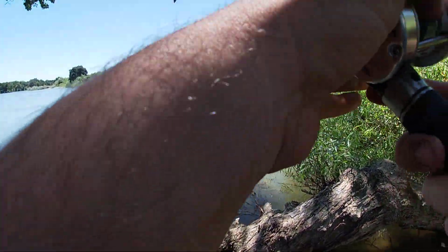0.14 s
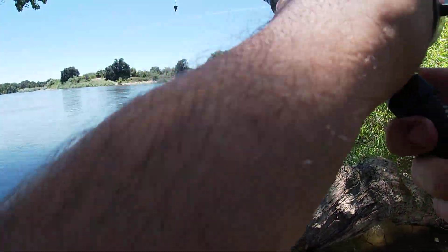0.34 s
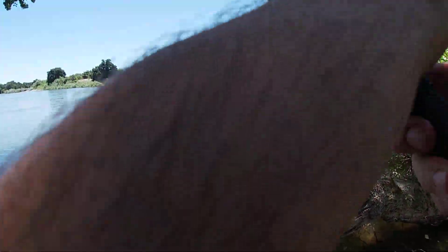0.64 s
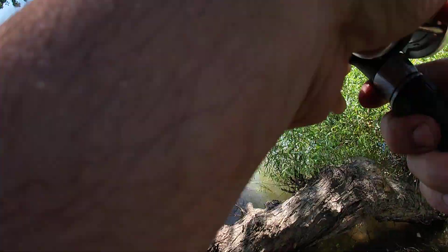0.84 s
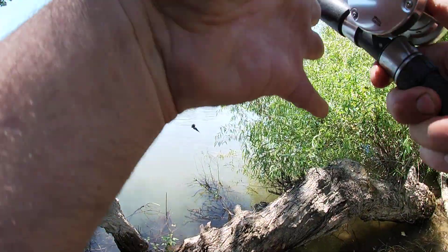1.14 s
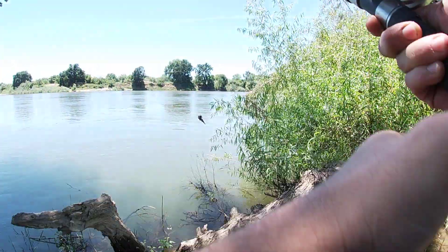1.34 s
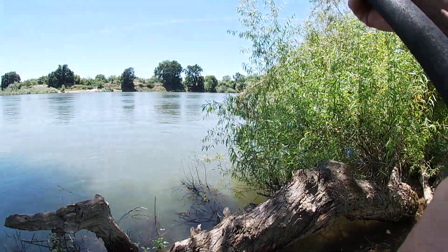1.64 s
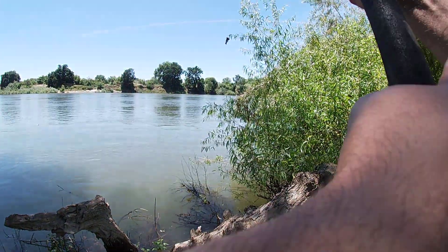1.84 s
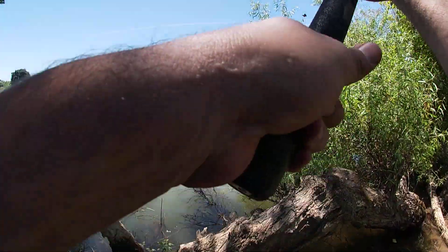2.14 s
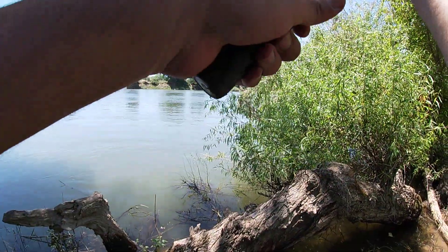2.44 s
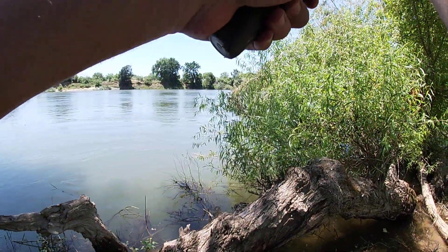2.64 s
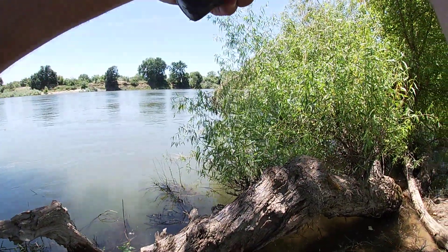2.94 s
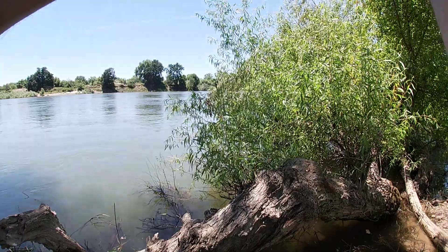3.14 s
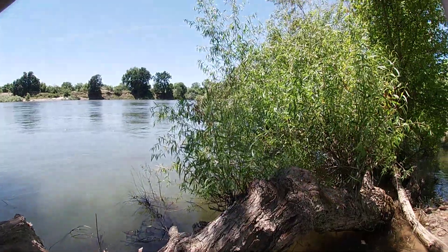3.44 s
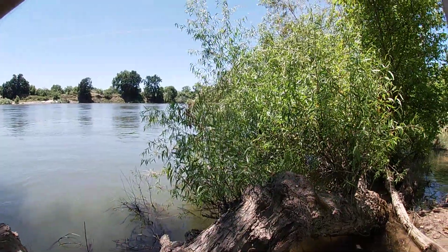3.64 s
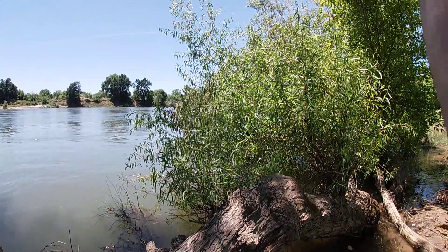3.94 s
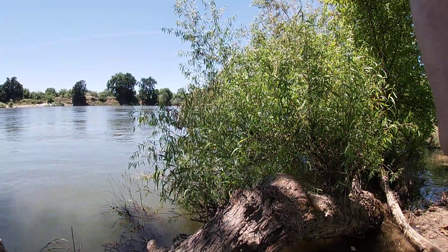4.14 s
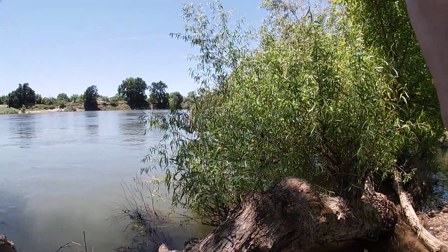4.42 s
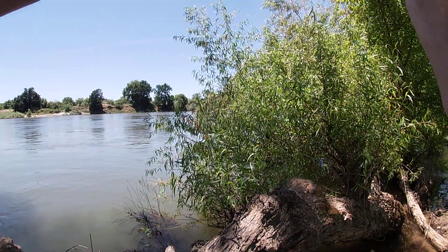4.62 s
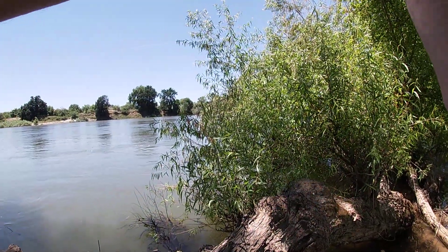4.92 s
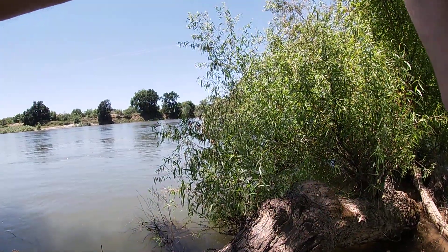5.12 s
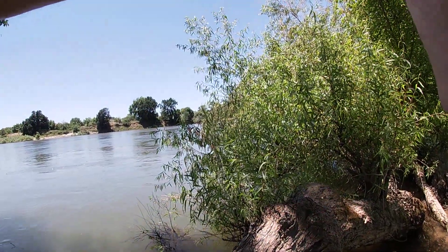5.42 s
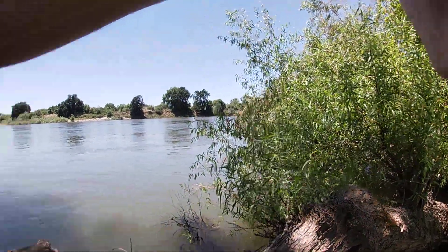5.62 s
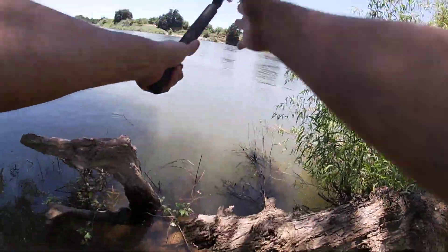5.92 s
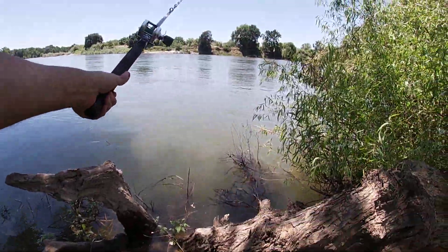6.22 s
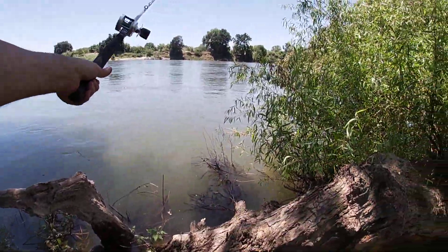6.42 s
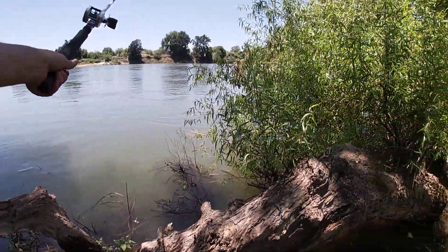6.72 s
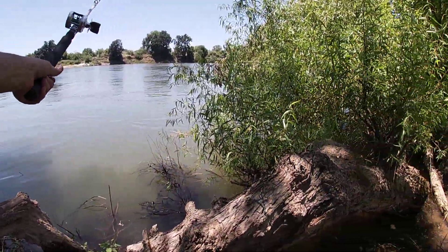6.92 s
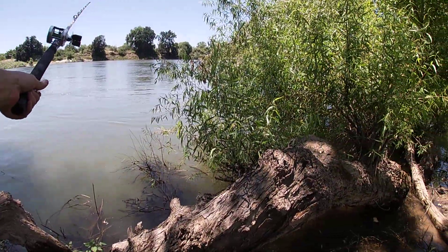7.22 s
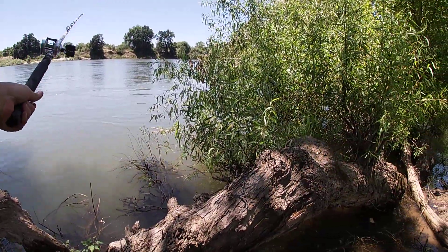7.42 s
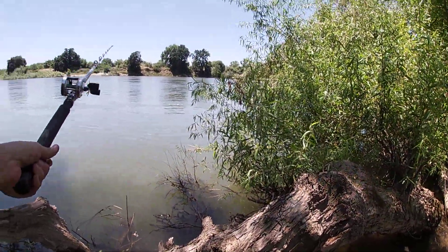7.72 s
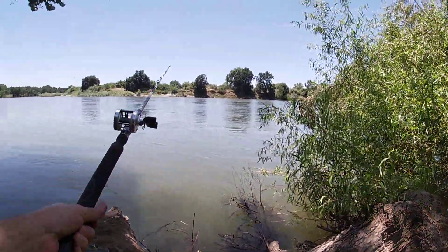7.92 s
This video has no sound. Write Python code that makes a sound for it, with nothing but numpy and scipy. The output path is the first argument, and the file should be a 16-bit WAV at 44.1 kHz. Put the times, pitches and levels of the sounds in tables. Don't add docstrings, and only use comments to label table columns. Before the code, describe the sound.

Sharp reel clicks and small handling rustles over a low distant boat motor, then a rod-casting swish and a thin whirring spool gradually slowing.

```python
import sys
import numpy as np
from scipy import signal
from scipy.fft import rfft, irfft
from scipy.io import wavfile
from scipy.ndimage import uniform_filter1d

SR = 44100
rng = np.random.default_rng(int(sys.argv[2]) if len(sys.argv) > 2 else 0)


def master_out(mix):
    frames = np.transpose(np.atleast_2d(mix))
    ceiling = np.clip(frames, -1, 1)
    pcm = np.round(ceiling * 32767).astype(np.int16)
    wavfile.write(sys.argv[1], SR, pcm)


def voltage_ratio(level):
    return 10 ** (np.asarray(level, float) / 20)


N = 355490

SPIN_S, SPIN_HZ, SAG_HZ_PER_S = 5.98, 2966, 221.7
BRAKE_S, BRAKE_HZ_PER_S = 8.01, 1500
BUMPS_PER_TURN = 13
WHINE_DB, WHINE_DB_PER_OCTAVE = -44.5, 11
# centre in seconds, rise of the tone in Hz,
# half length in seconds.
LINE_TUGS = [(6.068, 541, .034), (6.141, 704, .082), (6.293, 151, .052), (6.508, 550, .066),
             (6.61, 34, .027), (6.762, 311, .083), (6.892, 76, .029), (7.069, 135, .07), (7.103, 38, .029),
             (7.329, 41, .051), (7.738, 71, .058), (7.993, 101, .102)]
BALL_ORDERS = [8.66, 10.05, 15.13, 17.33, 20.11, 21.66, 34.66, 43.33]
BALL_ORDER_DB = [2, 6, 5.5, 2, 0, 4, 3, 1]
BUMP_OVERTONE_DB = [9, 10, 6]
# centre in Hz, width in Hz, level in dB.
FRAME_MODES = [(1310, 1460, -16.5), (2030, 930, -14.5), (2905, 640, 0), (4420, 650, 0.5), (5400, 2600, -19),
               (6790, 740, 1), (8480, 700, -9.5), (10000, 460, -4.5), (11700, 90, -8), (12300, 80, -15),
               (12000, 2200, -23), (14100, 900, -16.5)]
HAND_HOLD = {5: [(6, -0.5), (6.24, -1), (6.32, -2), (6.55, 0), (6.63, 0), (7.15, -0.5), (7.45, -0.5),
             (7.68, 1.5), (7.74, -2)], 7: [(6.16, -7), (6.24, -0.5), (7.5, -1), (8.06, 1)], 8: [(6.85, -12),
             (6.95, 4), (7.25, 2), (7.4, -4)], 10: [(6.2, -8), (6.35, 3)], 11: [(6.2, -12), (6.3, 3)]}
# cycles per turn,
# then rows of centre in seconds, half length in seconds, level in dB.
BEARING_SINGS = [
    (13, [(6.08, .03, -42.5), (6.15, 0.03, -52), (6.22, .03, -54), (6.29, .015, -57), (6.34, .025, -49), (6.42, .02, -50), (6.5, 0.021, -51.5), (6.62, .018, -47.5), (6.7, .03, -52), (6.8, 0.022, -51), (6.92, 0.029, -53), (7.02, .03, -49), (7.1, 0.02, -54), (7.21, 0.018, -51), (7.31, 0.044, -53), (7.49, 0.04, -54.5), (7.62, .07, -52), (7.82, 0.06, -50), (7.94, 0.052, -52.5), (8.04, 0.027, -51)]),
    (10.05, [(6.08, 0.019, -48), (6.22, .025, -50), (6.31, .03, -53), (6.455, .011, -49), (6.67, 0.037, -52.5), (7.24, .04, -58.5)]),
    (15.13, [(6.07, 0.034, -52), (6.17, .04, -55), (7, .07, -59), (7.18, 0.021, -60), (7.3, .02, -57), (7.42, .05, -65), (7.6, .03, -68), (7.76, .03, -64), (7.95, .07, -60)]),
                 (17.2, [(6.24, .04, -53), (6.33, .03, -56), (6.54, .025, -54), (6.7, .03, -56),
              (6.82, .03, -58), (7.06, .03, -58), (7.84, 0.028, -57.5)]), (21.66, [(6.98, .02, -59),
              (7.22, .025, -57), (7.41, 0.035, -51), (7.6, .06, -52.5), (7.78, .05, -55), (8, 0.043, -52)]),
              (26, [(6.26, .025, -55), (6.44, .04, -52), (6.56, .04, -52), (6.76, .04, -56),
              (7.48, .04, -62), (7.8, 0.077, -57.5)]), (27, [(6.27, 0.036, -50), (6.46, .04, -55),
              (6.59, 0.031, -54), (6.75, .035, -55)]), (39, [(7.22, .09, -60), (7.5, 0.054, -57),
              (7.72, .1, -62), (7.88, .04, -59)]), (52, [(7.45, .06, -70), (7.65, .05, -68),
              (7.95, .06, -65)]), (53, [(7.32, .04, -68), (7.75, .06, -70)]), (28, [(6.4, .03, -57),
              (6.6, .03, -55), (6.8, .03, -57)]), (30.3, [(6.64, .015, -53), (6.92, .02, -54),
              (7.08, .05, -57)]), (33, [(7.2, .03, -58), (7.4, .04, -55), (7.55, .04, -63)]),
              (34.66, [(7.44, .03, -55), (7.6, .06, -57)]), (19, [(6.62, .04, -57), (6.8, .06, -58)]),
              (20.11, [(6.36, .03, -60), (6.7, .04, -57), (7, .05, -58), (7.3, .04, -59)]),
              (25, [(6.5, .05, -52), (6.78, .05, -62)]), (31.8, [(7.06, .06, -59)]),
              (39.9, [(6.28, .03, -60), (6.52, .05, -62), (7.65, 0.049, -58), (7.86, 0.057, -55)])]

# time in seconds, housing hum in dB.
SWING_EFFORT = [(5.6, -69), (5.66, -64), (5.712, -55), (5.74, -44), (5.788, -50.5), (5.812, -48),
                (5.954, -55.5), (6.094, -47), (6.162, -56), (6.45, -58)]
# frequency in Hz, density in dB per Hz.
SWISH_SPECTRUM = [(120, -25), (200, 1), (650, -2.5), (1600, -6.5), (3000, -4.5), (3900, -8), (4800, -12),
                  (5600, -10.5), (8000, -13), (16000, -33)]

# start in seconds, peak in dB, low ring in Hz, high ring in Hz,
# length in seconds.
LEVER_CLICKS = [(0.267, -47, 6750, 11500, 0.0011), (0.557, -49, 1240, 4100, 0.0012),
                (0.785, -26.5, 1190, 2980, 0.00054), (0.7876, -29.5, 1670, 3000, 0.00092),
                (1.043, -22, 1620, 4090, 0.0008), (1.0725, -28, 1590, 4300, 0.0014),
                (1.11, -30.5, 4360, 1500, 0.0011), (1.159, -28, 3900, 3920, 0.0016),
                (1.171, -34, 2570, 4400, 0.0013), (1.1885, -40, 1820, 1760, .0013),
                (1.0035, -43, 1500, 1600, .0012), (0.762, -40, 1270, 2500, .001),
                (0.842, -41, 1850, 1000, .001), (0.907, -46, 1710, 1000, .001),
                (0.915, -40.5, 1640, 1300, .0012), (0.949, -41, 1650, 4300, .001),
                (.957, -43, 1600, 1300, .0012), (0.974, -42, 1600, 2200, .001),
                (4.305, -45, 2850, 2900, .0012), (1.014, -45, 1700, 1650, 0.0011),
                (1.133, -31, 4700, 2600, .001), (1.156, -34, 4900, 1500, 0.0011),
                (2.071, -32.5, 1360, 4420, 0.00031), (2.08, -40, 2660, 4500, 0.00089),
                (2.12, -39.5, 1320, 5700, 0.0006), (3.462, -36, 2690, 1300, 0.0014),
                (3.697, -34.5, 1950, 4360, 0.00052), (3.905, -43, 1510, 6300, 0.0011)]
# start in seconds, peak in dB, low ring in Hz, high ring in Hz.
GUIDE_TICKS = [(0.1064, -34.5, 3560, 6150), (0.471, -45.5, 10000, 14000), (.4716, -41, 3060, 6840),
               (1.088, -43, 8900, 6200), (0.756, -46, 2460, 9500), (1.128, -23, 4150, 7470),
               (1.292, -44, 4120, 7440), (3.348, -34, 7700, 2940), (4.2068, -37, 2860, 4240),
               (3.374, -42, 12000, 9000), (3.437, -50, 12000, 11000), (.335, -48, 4900, 10000),
               (5.723, -40, 2700, 5530), (5.7344, -42, 2730, 6000), (5.7843, -32, 12500, 6350),
               (5.8187, -24.5, 3520, 7360), (5.8205, -28, 2900, 8300), (5.745, -44, 12500, 9000),
               (5.87, -42, 9500, 12000), (5.8776, -34, 4490, 6160), (5.917, -33, 4400, 13500),
               (5.9737, -24, 2560, 7440)]
# start in seconds, peak in dB, ring in Hz.
HOUSING_JOLTS = [(5.7114, -37, 1210), (5.7246, -30, 1230), (5.731, -35, 1240), (5.7377, -32, 1280),
                 (5.745, -32, 1190), (5.7504, -32, 1165), (5.7553, -23, 1230), (5.7644, -35, 1270)]
# start in seconds, peak in dB.
SNAP_BLOWS = [
    (.613, -20),
    (.6145, -5),
    (.6154, -11),
    (.6167, -16),
    (.6178, -16),
    (.6228, -36),
]
# frequency in Hz, 60 dB decay in seconds, level in dB.
SNAP_MODES = [(190, .03, -17), (820, 0.039, -12), (1200, 0.018, -9), (2090, 0.008, -2), (2570, 0.0085, -10),
              (3050, 0.008, -8), (3970, .007, -4), (4880, 0.005, -4), (5400, 0.007, -6), (5960, 0.007, -6),
              (8600, 0.0043, -5)]
# start in seconds, level in dB, frequency in Hz, 60 dB
# decay in seconds.
HOUSING_KNOCKS = [
    (0.62, -24, 186, 0.054),
    (1.1303, -11.5, 115, 0.014),
    (2.119, -20.5, 150, 0.014),
    (2.903, -36.5, 112, 0.29),
    (3.66, -24, 121, 0.04),
    (5.721, -45, 34, 0.18),
    (5.756, -15, 50, 0.033),
]

# start in seconds, length in seconds, level in dB, centre in Hz.
CLOTH_RUBS = [(0, 0.052, -44, 600), (0, 0.0037, -43.5, 6000), (.01, 0.021, -50, 3500),
              (0.121, 0.067, -51, 5000), (0.186, 0.068, -58, 3900), (.617, 0.027, -45.5, 900),
              (0.619, 0.015, -45, 4000), (0.778, 0.065, -52, 5370), (0.96, 0.044, -56, 7040),
              (1.123, 0.013, -44, 3850), (1.126, 0.018, -43, 2440), (1.156, 0.012, -43, 2500),
              (1.677, 0.058, -49.5, 6500), (1.731, 0.1, -59, 6500), (1.888, 0.075, -51, 4580),
              (2.076, .028, -57, 3980), (2.106, 0.13, -56.5, 3560), (2.23, 0.15, -61, 3480),
              (3.093, 0.045, -60.5, 5000), (3.342, 0.052, -48.5, 6500), (3.348, 0.048, -52.5, 3240),
              (3.518, .091, -64, 8000), (3.685, .036, -58, 5010), (4.129, 0.031, -59.5, 6000),
              (4.224, 0.056, -57, 5030), (5.721, 0.11, -42.5, 3140), (1.125, .045, -44, 750),
              (0.618, 0.036, -42.5, 400), (.25, 0.19, -60, 1500), (0.198, 0.12, -60, 3200)]
# start in seconds, length in seconds, level in dB, centre in Hz.
LINE_RUSTLES = [(0, .35, -71, 11700), (.635, .09, -59, 11500), (.77, .2, -58, 11500),
                (1.08, .075, -56, 14000), (.1, 0.18, -62, 14000), (5.73, 0.22, -48, 13500)]
# start in seconds, length in seconds, level in dB, centre in Hz.
GRIP_CREAKS = [(0, 0.042, -38, 1760), (.67, 0.059, -54.5, 2610), (.684, 0.054, -52, 6160),
               (.912, 0.069, -57, 1600), (1.085, 0.03, -54, 1700), (3.354, .04, -49.5, 1280),
               (3.887, 0.024, -57, 1170), (4.074, 0.026, -57, 1300), (6.61, .025, -51, 6900),
               (6.8, .03, -52, 7000), (6.9, .025, -47, 6800), (5.64, .05, -57, 1300), (0, 0.036, -53, 760),
               (5.867, 0.19, -47, 4340), (7.618, 0.21, -57, 1304), (.13, 0.06, -56, 3700),
               (5.8, 0.055, -47, 1300)]
# start in seconds, length
# in seconds, level in dB, centre in Hz.
METAL_SQUEAKS = [(.797, .023, -53, 3800), (0.849, 0.036, -46.5, 3780), (.85, .035, -56, 5400),
                 (.845, .034, -59, 6900), (.902, .03, -59, 8300), (.622, 0.055, -62, 8500),
                 (.95, .04, -63, 8100), (.13, .045, -55, 6340), (.949, 0.063, -55.5, 4360),
                 (1.038, .0074, -49, 6000), (1.052, 0.012, -55, 6200), (1.07, .063, -58, 6960),
                 (1.143, .019, -53, 6900), (5.75, 0.053, -47.5, 5550), (5.895, 0.09, -52, 7200),
                 (5.99, 0.044, -49, 2770), (6.05, .05, -51, 4430), (6.17, .07, -53, 4450),
                 (8, .06, -55, 4500), (6.43, 0.04, -49, 2630), (3.343, .01, -50, 7900),
                 (3.375, .015, -64, 6600), (7.93, 0.09, -50, 4405)]
RUB_WIDTHS = [0.92, 0.44, 0.27, 0.074]
# start in seconds, frequency in Hz, level in dB, 60 dB decay in seconds.
TAUT_LINE = (1.02, 915, -60, 20)
# start in seconds, length in seconds, level in dB, frequency in Hz.
SPRING_WHISTLES = [
    (.586, 0.029, -46, 5600),
    (.09, .08, -62, 5300),
]

# time in seconds, rate in Hz.
FIRING_RATE = [(0, 98.46), (.9, 94.5), (1.4, 95.5), (2.2, 95.2), (4, 94), (5, 93.2), (6.5, 90.8),
               (8.06, 88)]
# centre in seconds, half length in seconds, level in dB.
FIRST_SWELLS = [(.04, 0.051, -37.5), (.42, 0.095, -34.5), (.74, 0.033, -39.5), (.92, 0.047, -31.5),
                (1.15, 0.026, -39), (1.58, 0.11, -34), (1.95, 0.097, -35.5), (2.31, 0.07, -34),
                (2.86, 0.046, -38.5), (3.09, 0.038, -38.5), (3.26, 0.028, -35.5), (3.47, 0.079, -44),
                (3.69, 0.029, -30.5), (3.9, 0.048, -32), (4.2, 0.02, -39), (4.39, 0.084, -41),
                (4.97, 0.11, -30.5), (5.26, 0.087, -35), (5.74, 0.14, -40.5), (5.99, 0.018, -34.5),
                (6.24, 0.055, -41.5), (6.4, 0.02, -38), (6.53, 0.016, -37.5), (6.86, 0.07, -35),
                (7.16, 0.081, -31.5), (7.4, 0.13, -40), (7.61, 0.13, -31), (7.98, 0.098, -52)]
# centre in seconds, half length in seconds,
# second partial in dB, third partial in dB.
OVERTONE_SWELLS = [(0, 0.22, -49.5, -52.5), (0.652, 0.13, -54.5, -54.5), (1.17, 0.035, -51, -52),
                   (3, 0.29, -50.5, -57.5), (3.805, 0.18, -50.5, -55.5), (4.723, 0.14, -41, -60),
                   (5.206, 0.093, -42, -62), (6.08, 0.3, -51, -57.5), (6.76, 0.055, -47, -54),
                   (7.699, 0.2, -50.5, -69)]
PARTIAL_LULL_DB = [-66, -63, -72]

# centre in seconds, half length in seconds, level in dB.
PORT_GUSTS = [(.1, 0.034, -39.5), (.68, 0.13, -46), (.93, 0.056, -41), (1.14, .04, -45), (1.55, 0.23, -49),
              (2.22, 0.086, -47), (2.95, .05, -40.5), (3.3, 0.13, -41), (3.7, 0.17, -42),
              (4.22, 0.049, -42.5), (4.5, 0.093, -37.5), (4.9, 0.091, -43.5), (5.28, .2, -39),
              (5.8, 0.094, -32), (6.1, 0.19, -39.5), (6.37, 0.043, -39.5), (6.9, 0.18, -36.5),
              (7.25, 0.12, -43), (7.56, 0.14, -35), (8.06, 0.11, -36.5)]
# frequency in Hz, density in dB per Hz.
WIND_SPECTRUM = [(8.8, -55), (15, -6), (59, 1), (75, 1), (90, -6), (120, -7), (200, -120)]
# frequency in Hz, density in dB per Hz.
WASH_SPECTRUM = [(24, -31), (40, -1), (81, -1), (134, -2), (199, -1.5), (334, -10.5), (800, -21.5),
                 (900, -18.5), (1170, -61), (1980, -120)]
# time in seconds, level in dB.
BANK_LEVEL = [(0, -56), (1.2, -55), (1.5, -59), (2.6, -57.5), (3.5, -57), (4.5, -55.5), (5.6, -53),
              (8.06, -56)]
# frequency in Hz, density in dB per Hz.
HISS_SPECTRUM = [(200, -36.5), (300, -8), (540, -5), (900, -8), (1350, -9.5), (2200, -15.5), (3700, -14.5),
                 (7000, -17.5), (10000, -26), (12500, -30.5), (16000, -53)]
# frequency in Hz, gain in dB.
HOUSING_RESPONSE = [(20, -1), (8500, -1), (9300, -7.5), (10200, -6.5), (11000, -13.5), (12200, -9.5),
                    (13000, -18), (14000, -15), (15000, -13), (16000, -37), (22050, -69)]


def table(rows):
    s, *columns = np.transpose(rows)
    return [np.interp(np.arange(N) / SR, s, c) for c in columns]


def gate(start_s, fade_s):
    return np.clip((np.arange(N) / SR - start_s) / fade_s, 0, 1)


def unit(x):
    return x / np.sqrt(np.mean(x ** 2))


def gains(spectrum):
    hz, db = np.transpose(spectrum)
    bins = np.fft.rfftfreq(N, 1 / SR)
    return voltage_ratio(np.interp(np.log(bins + 1), np.log(hz), db, -99, -99))


def coloured(spectrum):
    return unit(irfft(rfft(rng.standard_normal(N)) * gains(spectrum), N))


def walk(rate, start=0):
    k = int(SR / rate)
    steps = np.repeat(rng.standard_normal(N // k + 1), k)[start:N]
    return unit(uniform_filter1d(uniform_filter1d(steps, k), k))


def band(x, hz, width):
    return signal.lfilter(*signal.iirpeak(hz, hz / width, SR), x)


def double_band(x, hz, width):
    return band(band(x, hz, width), hz, width)


def ring(hz, t60, phase=0):
    t = np.arange(8192) / SR
    return np.sin(2 * np.pi * hz * t + phase) * 1000. ** (-t / t60)


def add(out, s, x):
    i = int(s * SR)
    out[i:i + len(x)] += x[:N - i]


def bells(rows, x):
    return sum(height * np.exp(-.5 * ((x - at) / half) ** 2) for at, half, height in rows)


def swells(rows, rest_db, x):
    coarse = x[::64]
    power = voltage_ratio(2 * rest_db) + bells([(at, half, voltage_ratio(2 * db)) for at, half, db in rows], coarse)
    return np.interp(np.arange(len(x)), np.arange(len(x))[::64], np.sqrt(power))


def spool():
    start = int(SPIN_S * SR)
    t = np.arange(start, N) / SR
    bump_hz = SPIN_HZ - SAG_HZ_PER_S * (t - SPIN_S) - BRAKE_HZ_PER_S * np.maximum(t - BRAKE_S, 0)
    bump_hz = bump_hz + bells([(s, half, hz) for s, hz, half in LINE_TUGS], t)
    turn = 2 * np.pi * np.cumsum(bump_hz / BUMPS_PER_TURN) / SR

    comb_db = {k: 2.2 * d for k, d in enumerate(rng.standard_normal(56), 4)}
    for m, extra_db in enumerate(BUMP_OVERTONE_DB, 2):
        order = m * BUMPS_PER_TURN
        comb_db[order] = extra_db
        comb_db[order + 1] = extra_db - 1
        comb_db[order - 1] = extra_db - 2
    comb_db.update(zip(BALL_ORDERS, BALL_ORDER_DB))

    grease = rng.standard_normal(len(turn)) * voltage_ratio(1.3 * walk(30)[start:])
    drive = voltage_ratio(-10.5) * (1 + .3 * np.cos(turn)) * grease
    samples = np.arange(len(turn))
    knots = np.linspace(0, len(turn), num=72)
    for k, db in comb_db.items():
        waver = np.interp(samples, knots, rng.standard_normal(len(knots)))
        drift = np.interp(samples, knots, rng.standard_normal(len(knots)))
        level = voltage_ratio(db - 33.5 + 3.8 * waver)
        drive = drive + level * np.cos(k * turn + .08 * k * drift)

    hold_db = {k: table(rows)[0][start:] for k, rows in HAND_HOLD.items()}
    sound = np.zeros(len(turn))
    for k, (hz, width, db) in enumerate(FRAME_MODES):
        mode = voltage_ratio(db + hold_db.get(k, 0)) * double_band(drive, hz, 1.43 * width)
        sound = sound + (-1) ** k * mode
    sound = unit(sound) * voltage_ratio(WHINE_DB + WHINE_DB_PER_OCTAVE * np.log2(bump_hz / SPIN_HZ))

    wobble = .035 * walk(25)[start:]
    for k, rows in BEARING_SINGS:
        level = swells(rows, -84, t) * voltage_ratio(1.8 * walk(45, start=start))
        phase = k * (turn + wobble) + k / 40 * walk(60, start=start)
        sound = sound + np.sqrt(2) * level * np.cos(phase)
    return np.pad(sound, (start, 0)) * gate(SPIN_S, 0.066)


def swing():
    hum_db = table(SWING_EFFORT)[0]
    fade_out = np.clip((SWING_EFFORT[-1][0] - np.arange(N) / SR) / 0.24, 0, 1)
    fade = gate(SWING_EFFORT[0][0], 0.13) * fade_out
    hum = unit(band(band(rng.standard_normal(N), 1260, 250), 1264, 240))
    swish_db = -29.5 + 0.31 * hum_db + 2.1 * walk(90)
    return fade * (voltage_ratio(hum_db + 4.0) * hum + voltage_ratio(swish_db) * coloured(SWISH_SPECTRUM))


def contacts():
    out = np.zeros(N)
    t = np.arange(1024) / SR
    # start, peak dB, two rings in Hz, length s, crack in dB over the rings
    rows = [(*row, 2) for row in LEVER_CLICKS]
    rows += [(*row, .0012, 7) for row in GUIDE_TICKS]
    rows += [(s, db, hz, hz, 0.0013, -12) for s, db, hz in HOUSING_JOLTS]
    noises = rng.standard_normal((len(rows), len(t)))
    for (s, db, low_hz, high_hz, length, crack_db), noise in zip(rows, noises):
        contact = (t / length) ** 2 * np.exp(-2 * t / length)
        rings = np.sin(2 * np.pi * low_hz * t) + 0.59 * np.sin(2 * np.pi * high_hz * t)
        crack = voltage_ratio(crack_db) * band(band(noise, high_hz, 9000), 4500, 12000)
        x = contact * (rings + crack)
        add(out, s, voltage_ratio(db) * x / abs(x).max())
    return out


def release_snap():
    snap = np.zeros(N)
    for (s, db), noise in zip(SNAP_BLOWS, rng.standard_normal((len(SNAP_BLOWS), 8192))):
        rings = sum(voltage_ratio(d) * ring(hz, t60, 3 * noise[k]) for k, (hz, t60, d) in enumerate(SNAP_MODES))
        crack = 1.2 * band(noise, 4700, 5000) * ring(0, 0.012, np.pi / 2)
        add(snap, s, voltage_ratio(db) * (rings + crack))
    return voltage_ratio(-3.5) * snap / abs(snap).max()


def knocks():
    out = np.zeros(N)
    for s, db, hz, t60 in HOUSING_KNOCKS:
        add(out, s, -voltage_ratio(db) * ring(hz, t60))
    return out


def rubs():
    out = np.zeros(N)
    rows = []
    for kind, share in zip([CLOTH_RUBS, LINE_RUSTLES, GRIP_CREAKS, METAL_SQUEAKS], RUB_WIDTHS):
        rows += [(*row, share * row[-1]) for row in kind]
    for (s, length, db, hz, width), noise in zip(rows, rng.standard_normal((len(rows), 16000))):
        noise = noise * voltage_ratio(2.2 * np.repeat(noise[::160], 160))
        n = min(int(1.29 * length * SR), 16000)
        envelope = np.sin(np.pi * np.linspace(0, 1, n) ** 0.62)
        add(out, s, voltage_ratio(db) * envelope * unit(double_band(noise, hz, 1.48 * width))[:n])
    return out


def line_and_spring():
    out = np.zeros(N)
    s, hz, db, t60 = TAUT_LINE
    t = np.arange(int(.99 * SR)) / SR
    hum = np.sin(2 * np.pi * hz * t) * 1000. ** (-t / t60)
    add(out, s, voltage_ratio(db) * hum * signal.windows.tukey(len(t), .1))
    for s, length, db, hz in SPRING_WHISTLES:
        rise = np.linspace(0, 1, int(length * SR))
        add(out, s, voltage_ratio(db) * rise ** 0.77 * np.sin(2 * np.pi * hz * length * rise))
    return out


def motor():
    t = np.arange(N) / SR
    phase = 2 * np.pi * np.cumsum(table(FIRING_RATE)[0]) / SR
    second = [(s, half, db) for s, half, db, _ in OVERTONE_SWELLS]
    third = [(s, half, db) for s, half, _, db in OVERTONE_SWELLS]
    out = np.zeros(N)
    for k, (rows, rest_db) in enumerate(zip([FIRST_SWELLS, second, third], PARTIAL_LULL_DB), 1):
        level = swells(rows, rest_db, t) * voltage_ratio(1.47 * walk(25))
        out = out + np.sqrt(2) * level * np.sin(k * phase + 0.58 * walk(14))
    return out


def bank():
    t = np.arange(N) / SR
    wind = swells(PORT_GUSTS, -51.5, t) * voltage_ratio(1.0 * walk(2.85)) * coloured(WIND_SPECTRUM)
    wash = voltage_ratio(-43) / (1 + t / 7.2) * coloured(WASH_SPECTRUM)
    hiss = voltage_ratio(table(BANK_LEVEL)[0] + 0.96 * walk(4.8)) * coloured(HISS_SPECTRUM)
    return wind + wash + hiss


def scene():
    handling = contacts() + release_snap() + knocks() + rubs() + line_and_spring()
    mid = spool() + swing() + handling + motor() + bank()
    return np.array([mid, mid])


def low_pass(x):
    return signal.sosfilt(signal.butter(12, 16520, fs=SR, output="sos"), x)


def record(dry):
    mid = irfft(rfft(dry[0]) * gains(HOUSING_RESPONSE), N)
    high_pass = signal.butter(N=16, Wn=12500, btype="high", fs=SR, output="sos")
    side = voltage_ratio(1) * np.roll(signal.sosfilt(high_pass, mid), 37)
    return low_pass(np.array([mid + side, mid - side]))


dry = scene()
out = record(dry)
master_out(out)
```